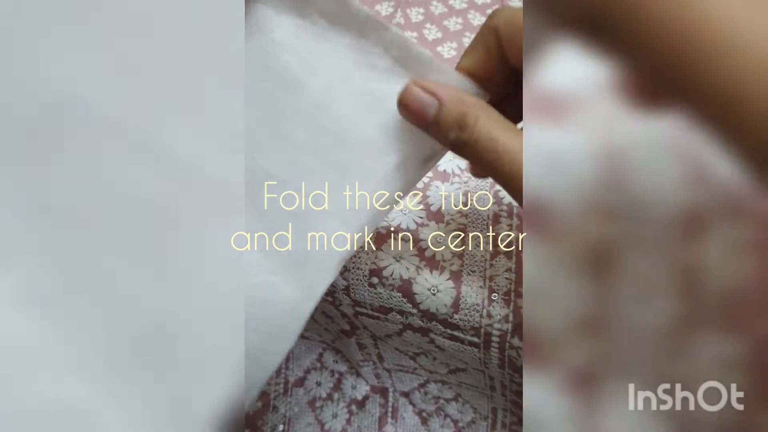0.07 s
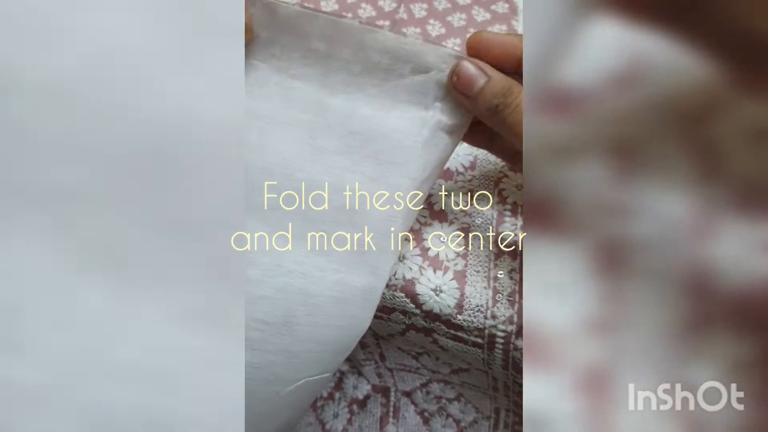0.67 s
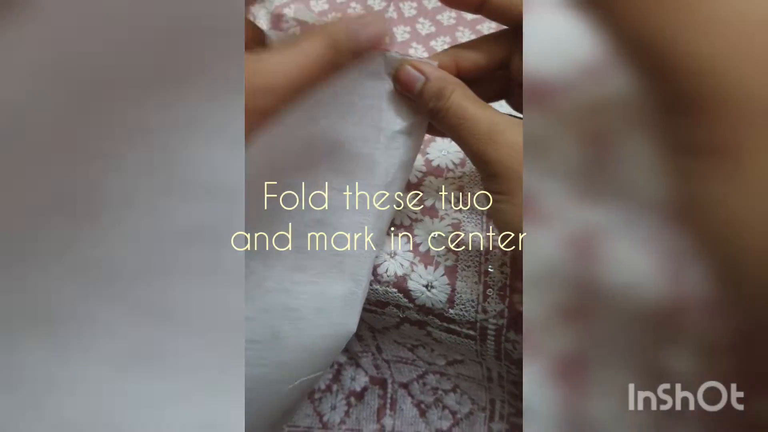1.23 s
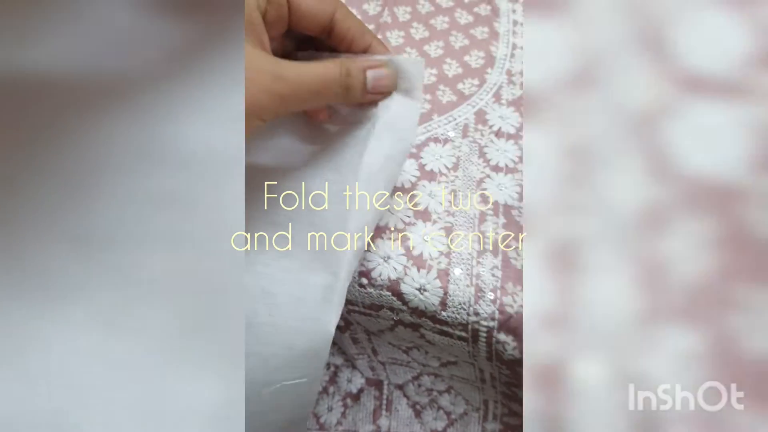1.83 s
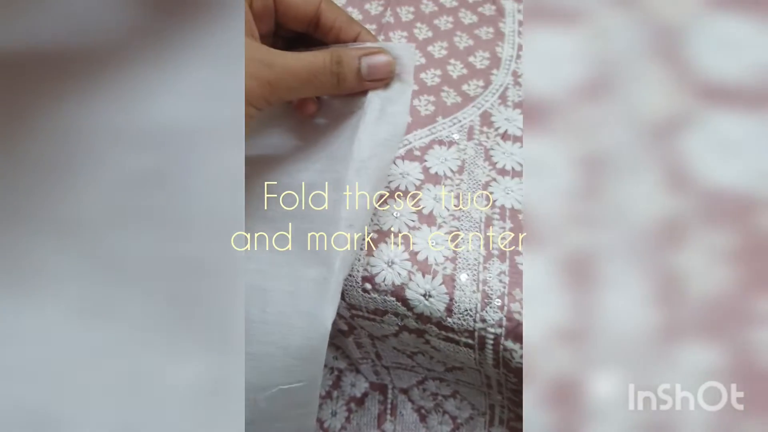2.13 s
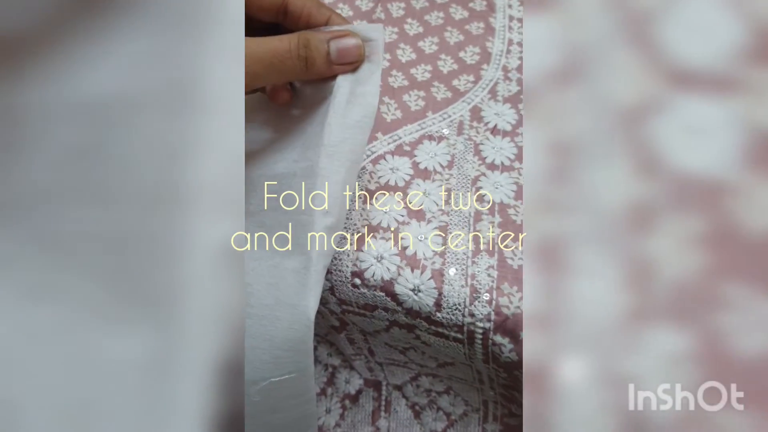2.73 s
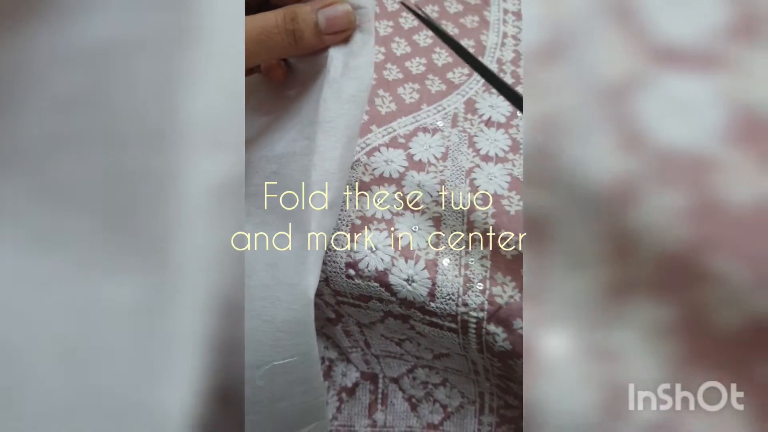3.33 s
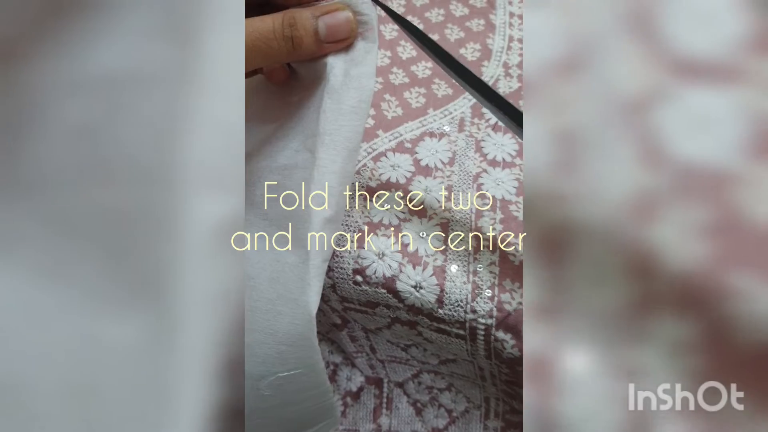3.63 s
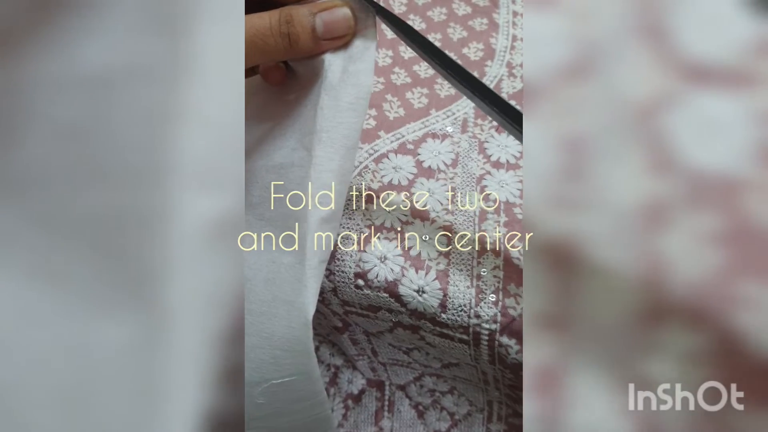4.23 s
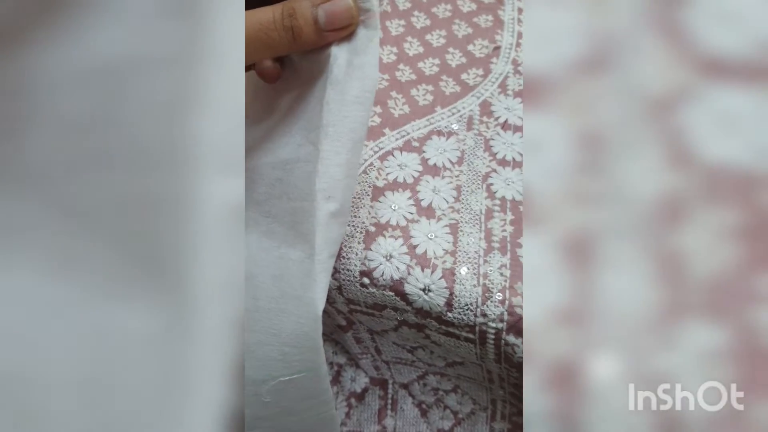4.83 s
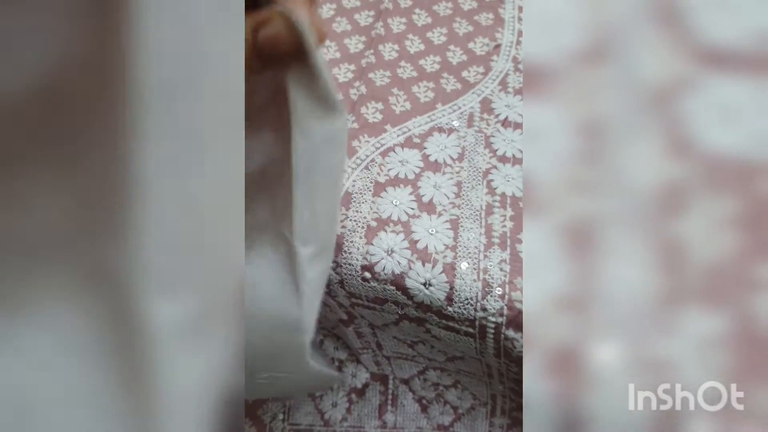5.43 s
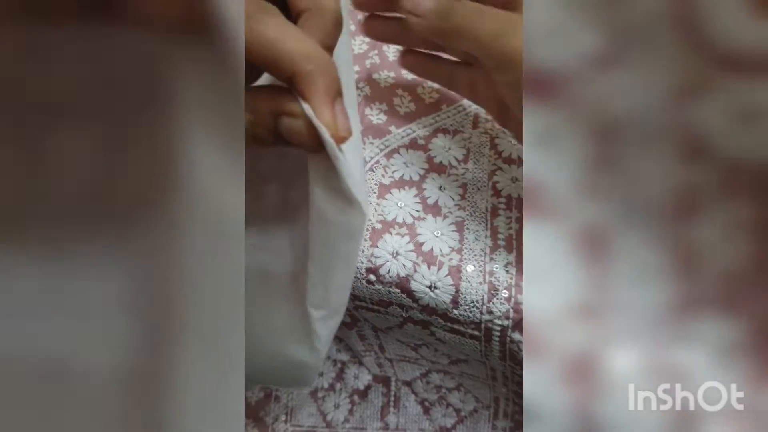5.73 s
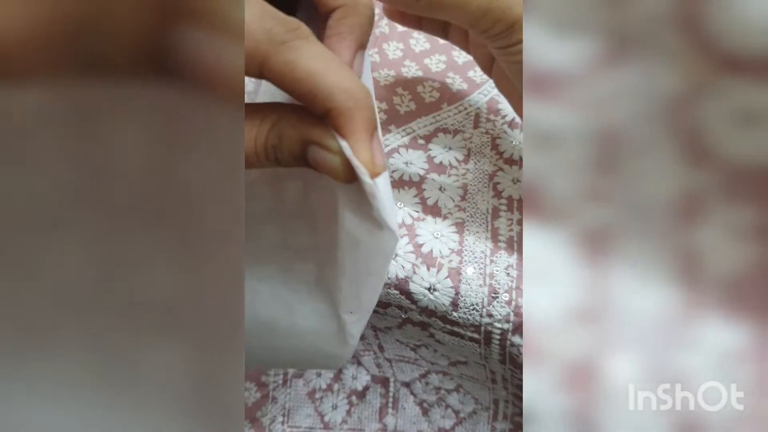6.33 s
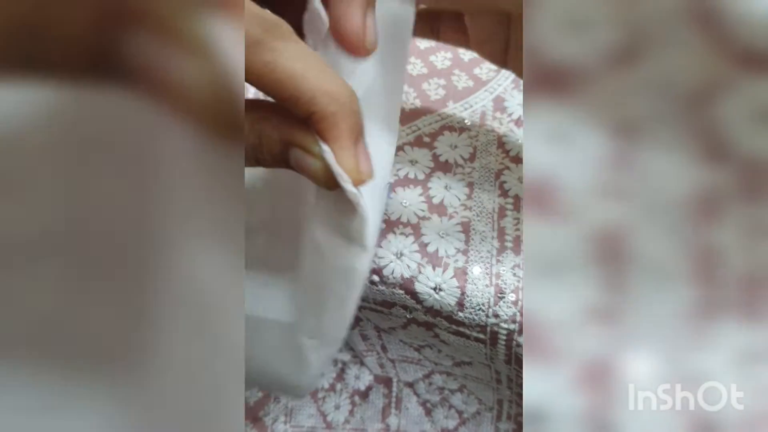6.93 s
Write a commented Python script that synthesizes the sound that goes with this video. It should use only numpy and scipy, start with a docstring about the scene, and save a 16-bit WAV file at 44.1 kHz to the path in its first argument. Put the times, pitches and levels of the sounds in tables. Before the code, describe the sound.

For the first two seconds, stiff cloth rustles and ticks very faintly over a low room hum. At about 2.4 seconds steel scissors are picked up with a click, a short scrape and a knock on a covered table. Two deep, soft microphone bumps follow on the right around 2.7 seconds, and the blades open with a small scrape and click at 2.9. After a quiet stretch, they close in one crisp, bright snip at 4.5 seconds, with a lighter click just after. From 5 seconds the scissors tap the table and slide, then drop at 5.3 with a metallic clatter and a hollow boom, the loudest moment. A few knocks settle by 5.5, leaving a faint thin tone. Soft cloth rustles and ticks return from about 5.8 to 7.2 seconds as the hum swells slightly. Everything sounds close, in a small bare room.

```python
"""Scissors snip folded cloth

Stiff cloth rustles and ticks as it is folded on a covered table in a small bare room, over a low hum.
Close to a phone, steel scissors are picked up, opened and closed in one snip; each click and scrape
rings the blades. Laid down, they touch, slide and drop, and the table booms."""
import sys
import numpy as np
from scipy import signal
from scipy.fft import rfft, irfft
from scipy.io import wavfile

SR = 44100
rng = np.random.default_rng(int(sys.argv[2]) if len(sys.argv) > 2 else 0)


def inscribe(sig):
    """Save sig as 16-bit PCM at rate SR to the path in sys.argv[1].

    A 1-D sig is mono; a 2-D sig holds one channel per row.
    Samples are clipped to [-1, 1] before scaling.
    """
    pcm = np.round(np.clip(np.atleast_2d(sig).T, -1, 1) * 32767)
    wavfile.write(sys.argv[1], SR, pcm.astype(np.int16))


N = 312669
T = np.arange(N) / SR
RING_T = T[:SR * 2 // 3]  # seconds, long enough for one blow or echo
# A ring_s is the time to fade by 60 dB; a fall time is the time to fade to about a third.


def undb(db):
    """Turn decibels into a gain."""
    return 10 ** (np.asarray(db) / 20)


def unit(x):
    """Scale x to an average (rms) level of 1."""
    return x / np.sqrt(np.mean(x ** 2))


def at(points, hz):
    """Read a curve of (pitch_hz, value) points, with octaves evenly spaced."""
    pitches, values = np.transpose(points)
    return np.interp(np.log(hz + 1), np.log(pitches), values)


def freqs(x):
    """The frequencies in the spectrum of x."""
    return np.fft.rfftfreq(x.shape[-1], 1 / SR)


def colour(x, points, tilt_db=0):
    """Shape the spectrum of x, tilting the treble by tilt_db per octave."""
    hz = freqs(x)
    gain_db = at(points, hz) + tilt_db * np.log2(np.maximum(hz, 1500) / 6000)
    return irfft(rfft(x) * undb(gain_db), x.shape[-1])


def band(x, hz, octaves):
    """Keep a band of pitches around hz."""
    edges = np.clip([hz / 2 ** (octaves / 2), hz * 2 ** (octaves / 2)], 10, SR / 2 - 100)
    return signal.sosfilt(signal.butter(2, edges, "band", fs=SR, output="sos"), x)


def high_pass(x, hz):
    """Thin out the bass."""
    return signal.sosfilt(signal.butter(3, hz, "high", fs=SR, output="sos"), x)


def add(out, start_s, x):
    """Mix x into out from start_s on."""
    i = int(start_s * SR)
    x = x[..., max(-i, 0):N - i]
    out[:, max(i, 0):max(i, 0) + x.shape[-1]] += x


def through(x, response):
    """Let every sample of x set off a ring or an echo."""
    return signal.fftconvolve(x, np.atleast_2d(response), axes=1)[:, :x.shape[1]]


def stereo_noise(size):
    """Noise from all sides at two microphones: alike in the bass, less so above."""
    # how alike left and right are: pitch_hz, correlation
    likeness = [(60, .6), (130, .98), (320, .94), (520, .4), (1100, -.3), (2200, .1), (6000, .3),
                (13000, .55)]
    mid, side = rfft(rng.standard_normal((2, size)))
    alike = np.clip(at(likeness, np.fft.rfftfreq(size, 1 / SR)), -1, 1)
    common = mid * np.sqrt((1 + alike) / 2)
    opposed = np.array([[1], [-1]]) * side * np.sqrt((1 - alike) / 2)
    return irfft(common + opposed, size)


def ringing(tones, scatter_db):
    """A struck object's fading tones; the spot that is hit varies their levels by scatter_db."""
    ring = 0
    for k, (hz, db, ring_s) in enumerate(tones):
        gain = (-1) ** k * undb(db + scatter_db * rng.standard_normal())
        ring += gain * np.sin(2 * np.pi * hz * RING_T) * np.exp(-np.log(1000) * RING_T / ring_s)
    return ring / np.linalg.norm(ring)


def friction(length_s, rise_share, spectrum, tilt_db, slips_per_s, spread_db=3.5):
    """Rubbing is many tiny slips of uneven size, swelling and dying with the stroke."""
    t = np.arange(0, length_s, 1 / SR)
    hold = max(int(SR / slips_per_s), 1)
    slip_db = spread_db * np.clip(rng.standard_normal(len(t) // hold + 1), -2, 2)
    slips = np.repeat(undb(slip_db), hold)[:len(t)]
    swell = np.sin(np.pi / 2 * np.interp(t / length_s, [0, min(rise_share, 1), 1], [0, 1, 0])) ** 2
    return unit(colour(stereo_noise(len(t)) * slips, spectrum, tilt_db)) * swell


def room(x, wet_db, gap_s):
    """Bare walls add a wash of echoes, with little deep bass, that builds up after a short gap."""
    # how long the room rings: pitch_hz, ring_s
    ring_times = [(100, 0.3), (500, 0.42), (1500, 0.374), (4000, 0.31), (11000, 0.37), (15500, 0.27)]
    hz, t, cells = signal.stft(stereo_noise(SR), SR, nperseg=256)
    fade = np.exp(-np.log(1000) * t / at(ring_times, hz)[:, None])
    tail = signal.istft(cells * fade, SR)[1][:, :len(RING_T)]
    tail = high_pass(tail, hz=147) * np.clip(RING_T / gap_s - 1, 0, 1)
    return x + undb(wet_db) * through(x, tail / np.linalg.norm(tail[0]))


def background(hum_hz=57, drift_hz_per_s=0.92, hum_db=-72, ramp_s=0.024):
    """Room air, faint wavering tones and a low hum that swells out of a rumble."""
    # swells of the hum: start_s, end_s, level_db
    swells = [(2.09, 2.66, -65), (4.811, 5.297, -70.5), (6.286, 6.996, -60.5)]
    # faint tones in the room: pitch_hz, level_db
    tones = [(199.2, -90), (452.2, -87)]
    # spectrum of the room air: pitch_hz, level_db
    air_colour = [(20, -37.5), (30, -23), (42, -17), (62, -9.5), (90, -6.5), (140, -12.5), (170, -26.5),
                  (200, -16), (240, -21), (450, -21), (560, -30.5), (1200, -36), (6000, -46.5), (9500, -42),
                  (16000, -42.5)]
    swell = sum(undb(db) * np.clip(np.minimum(T - start, end - T) / ramp_s, 0, 1)
                for start, end, db in swells)
    phase = 2 * np.pi * np.cumsum(hum_hz + drift_hz_per_s * T) / SR
    hum = np.sqrt(2) * np.sin(phase) * (undb(hum_db) + swell)
    rumble = undb(-70) * unit(band(stereo_noise(N), hz=61.7, octaves=0.837))
    drone = sum(undb(db) * unit(band(rng.standard_normal(N), hz, octaves=0.055)) for hz, db in tones)
    air = undb(-69) * unit(colour(stereo_noise(N), air_colour))
    return hum + rumble + drone + air


def mount_bumps(rest_hz=56.84, extra_hz=64.96, relax_s=0.03011, rise_s=0.0382, fall_s=0.0382):
    """The phone's bumped mount swings faster while pressed, then sags in pitch as it relaxes."""
    # soft bumps on the mount: start_s, level_db
    bumps = [(2.657, -26.5), (2.764, -24.5)]
    out = np.zeros((2, N))
    hz = rest_hz + extra_hz * np.exp(-RING_T / relax_s)
    swing = np.sin(2 * np.pi * np.cumsum(hz) / SR)
    rise = np.sin(np.pi / 2 * np.minimum(RING_T / rise_s, 1)) ** 2
    fall = np.exp(-np.maximum(RING_T - rise_s, 0) / fall_s)
    for start_s, db in bumps:
        noise = rng.standard_normal(len(RING_T))
        shudder = unit(band(band(noise, hz=80, octaves=2), hz=80, octaves=2))
        add(out, start_s, undb(db) * rise * fall * (swing + undb(-8) * shudder))
    return out * undb([[-34], [0]])  # almost all on the right


def cloth(fold_db=-10, tick_rise_s=0.0012, tick_fall_s=0.00533):
    """The weave hisses under the fingers, takes a tone from the fold and ticks where it buckles."""
    # fingers rub the cloth: peak_s, length_s, level_db, tilt_db_per_octave, fold_hz
    rubs = [(0.155, 0.203, -79.5, 0.5, 1530), (0.342, 0.1453, -67, -3, 784), (0.627, 0.151, -74.5, 3, 1615),
            (0.839, 0.151, -77.5, 4, 1610), (1.13, 0.093, -71.5, 4, 1690), (1.189, .1, -71, -2, 3500),
            (1.597, 0.39, -72, -6.5, 698), (1.805, 0.1138, -67, -2.5, 12200),
            (1.793, 3.01, -85.5, -0.5, 10400), (2.63, 0.676, -74, 2.5, 3980), (5.836, .3, -78.5, 0.5, 3235),
            (6.364, 0.11, -74.5, -2.5, 1690), (6.536, 0.1994, -68.5, -1.5, 3604),
            (6.645, 0.1112, -64.5, -2, 1554), (6.881, 0.406, -80.5, -2, 8060),
            (7.08, 0.1385, -67.5, -3.5, 2996)]
    # the stiff cloth buckles: start_s, level_db
    creases = [(0.114, -63), (.96, -76), (1.091, -70.5), (1.581, -59.5), (1.841, -59.5), (2.31, -61),
               (6.62, -55.5), (7.072, -68.5)]
    # spectrum of the weave's hiss: pitch_hz, level_db
    weave_colour = [(200, 8), (700, -1), (1100, -6.5), (1800, -3.5), (3500, -10), (5500, -3.5), (8000, 2),
                    (12500, -0.5), (16000, -13.5)]
    out, t = np.zeros((2, N)), RING_T[:SR // 10]
    for peak_s, length_s, db, tilt_db, fold_hz in rubs:
        hiss = friction(length_s, .5, weave_colour, tilt_db, slips_per_s=190)
        fold = unit(band(hiss, fold_hz, octaves=.55)) * np.std(hiss)
        add(out, peak_s - length_s / 2, undb(db) * (hiss + undb(fold_db) * fold))
    tick_shape = np.exp(-t / tick_fall_s) * (1 - np.exp(-t / tick_rise_s))
    for start_s, db in creases:
        fibres = stereo_noise(len(t))
        tick = unit(band(fibres, hz=1620, octaves=0.91))
        hiss = undb(-6) * unit(colour(fibres, weave_colour))
        add(out, start_s, undb(db) * (tick + hiss) * tick_shape)
    return out


def blow(hz, octaves, fall_ms, ring_db, crack_db=-25, rise_s=0.0008, cover_fall_s=.35):
    """One blow or soft slide on the table: a dull thud, a faint crack and a ring that the cover shortens."""
    # tones of the board without its cover: pitch_hz, level_db, ring_s
    board_tones = [(113, 4, .5), (126, -9, .3), (202, -7, .5), (258, -1, .5), (286, 0, .45), (315, -3, .4),
                   (336, -5, .4), (400, -5, .35), (453, -2, .35), (500, -4, .35), (515, -3, .35),
                   (559, -4, .35), (628, -8, .4), (659, -6, .4), (788, -9, .35), (960, -6, .4),
                   (1015, -9, .42), (1407, -10, .4)]
    onset = SR // 25  # the first 40 ms set the levels
    rattle = stereo_noise(len(RING_T)) * np.exp(-RING_T * 1000 / fall_ms)
    rattle *= 1 - np.exp(-RING_T / rise_s)
    thud = band(rattle, hz, octaves)
    board = band(ringing(board_tones, scatter_db=0), hz, octaves) * np.exp(-RING_T / cover_fall_s)
    crack = band(rattle, 2 * hz, octaves=5.3)
    thud, board, crack = (part / np.std(part[..., :onset]) for part in (thud, board, crack))
    hit = thud + undb(ring_db) * board + undb(crack_db) * crack
    return hit / np.std(hit[:, :onset])


def table(heavy_db=-36, full_boom_db=-28):
    """Every blow or soft slide knocks; heavy ones also flex the whole board, which booms."""
    # blows and soft slides on the table (slides fall slowly): start_s, level_db, pitch_hz, width_octaves,
    # fall_ms
    knocks = [(0.11, -62, 284, 1.43, 4.8), (.184, -69, 353, 0.64, 2.1), (0.228, -78.5, 589, 0.73, 3.3),
              (.24, -63.5, 189, 2.28, 9), (1.09, -76.5, 690, 1.59, 2.07), (2.231, -63.5, 232.7, 1.31, 42),
              (2.312, -58.5, 369, 1.54, 40), (2.388, -44.5, 289.2, 0.692, 46),
              (2.396, -59.5, 984, 0.98, 10.1), (2.68, -56, 175.8, 1.35, 19), (3.082, -55, 165, 1.825, 34.3),
              (3.096, -59, 425.6, 0.92, 69.4), (4.531, -62.5, 392, 1.24, 6.5),
              (5.007, -42.5, 251.5, 0.312, 42.5), (5.02, -54, 544, 1.62, 87),
              (5.05, -41.5, 256.2, 0.332, 59.5), (5.2604, -27, 450, 1.4, 5), (5.275, -24, 498, 0.55, 14),
              (5.299, -24, 320, 1.54, 63), (5.323, -25.5, 919, 1.48, 8.3), (5.341, -36.5, 1774, 0.9, 43),
              (5.393, -28, 383.2, 2, 11), (5.406, -25, 441, 1.1, 13), (5.4375, -33.5, 894, 1.15, 26),
              (5.498, -36, 331, 1.8, 20)]
    out = np.zeros((2, N))
    for start_s, db, hz, octaves, fall_ms in knocks:
        boom_db = full_boom_db + 4 * min(db - heavy_db, 0)  # light blows barely boom
        add(out, start_s, undb(db) * blow(hz, octaves, fall_ms, ring_db=-1))
        add(out, start_s, undb(boom_db) * blow(hz=108, octaves=0.99, fall_ms=34, ring_db=6))
    return out


def lingering_tone():
    """One thin tone outlasts the boom of the table."""
    # the tone after the drop: start_s, pitch_hz, level_db, ring_s
    tone = (5.324, 620, -64, 2.0)
    start_s, hz, db, ring_s = tone
    t = np.maximum(T - start_s, 0)
    return undb(db) * np.sin(2 * np.pi * hz * t) * np.exp(-np.log(1000) * t / ring_s)


def blades(contact, start_s, ring_db=-11, grip_db=5, grip_octaves=.1):
    """A contact rings the blades, a little differently with every grip and opening."""
    # blade tones, damped by the hand and the table cover: pitch_hz, level_db, ring_s
    steel_tones = [(2100, -4, .03), (2300, -4, .03), (2570, -1, .03), (2970, -1, .04), (4010, -5, .025),
                   (4260, -4, .025), (4750, -5, .02), (5990, -3, .02), (6850, -3, .018), (7760, 1, .018),
                   (9860, -1, .015), (10500, -3, .015), (11500, -3, .01), (12550, -1, .01),
                   (13700, -3, .01)]
    # the pitch that the grip lets ring most: time_s, pitch_hz
    grips = [(2.4, 2970), (2.9, 2270), (4.5, 2377), (5.1, 2860), (5.3, 2920)]
    contact = np.pad(contact, ((0, 0), (0, SR // 3)))
    free_hz = np.interp(start_s, *np.transpose(grips))
    tones = []
    for hz, db, ring_s in steel_tones:
        boost_db = grip_db * np.exp(-(np.log2(hz / free_hz) / grip_octaves) ** 2)
        tones.append((hz * (1 + rng.standard_normal() / 40), db + boost_db, ring_s))
    ring = ringing(tones, scatter_db=2.5)[:SR // 3]
    return contact + undb(ring_db) * through(contact, ring)


def scissors(click_rise_s=0.00079, click_fall_s=0.00253):
    """Steel clicks and scrapes, and each contact sets the two blades ringing."""
    # steel meets steel or the table: start_s, level_db, tilt_db_per_octave
    clicks = [(2.3867, -30, -4.5), (2.871, -50.5, -2.5), (2.9107, -36, -2), (4.4477, -49, 2),
              (4.5035, -25, 10.5), (4.5319, -28.5, 1.5), (4.758, -39.5, 2), (5.0099, -29, -2),
              (5.0486, -26, -4), (5.0734, -36, 0.5), (5.139, -34.5, -1.5), (5.2624, -26.5, 3.5),
              (5.297, -19.5, -3.5), (5.3276, -14.5, 0), (5.3314, -20, 1), (5.387, -30.5, -6)]
    # steel slides: start_s, length_s, rise_share (part spent swelling), level_db, tilt_db_per_octave
    scrapes = [(2.394, 0.126, 0.043, -51, -5), (2.888, .046, 0.456, -44, -1.5),
               (3.825, 0.0758, 0.57, -64.5, 0), (4.455, 0.0142, .5, -47, 3.5),
               (4.496, 0.0235, 0.457, -42, 1), (4.517, .021, 0.654, -36, 1.5),
               (4.745, 0.0217, 0.245, -51.5, -0.5), (5.026, 0.2903, 0.27, -42.5, -4)]
    # spectrum of a steel contact: pitch_hz, level_db
    steel_colour = [(300, -18), (1300, -15.5), (1800, -12.5), (2150, -8), (2550, -1.5), (3400, -7),
                    (4400, -2), (5200, -4.5), (7700, 0), (11000, -1.5), (13000, 2), (16000, -13)]
    out, t = np.zeros((2, N)), RING_T[:SR // 20]
    click_shape = np.exp(-t / click_fall_s) * (1 - np.exp(-t / click_rise_s))
    for start_s, db, tilt_db in clicks:
        click = unit(colour(stereo_noise(len(t)), steel_colour, tilt_db)) * click_shape
        add(out, start_s, undb(db) * blades(click, start_s))
    for start_s, length_s, rise_share, db, tilt_db in scrapes:
        slide = friction(length_s, rise_share, steel_colour, tilt_db, slips_per_s=500)
        add(out, start_s, undb(db) * blades(slide, start_s))
    return out


def scene():
    """Scissors, table and cloth in the room, with the bumps and the background."""
    return (room(scissors(), wet_db=-5.5, gap_s=0.0033)
            + room(table(), wet_db=-9, gap_s=0.02) + lingering_tone()
            + room(cloth(), wet_db=-6, gap_s=0.005)
            + mount_bumps() + background())


def record(dry, top_hz=16200):
    """The phone's two microphones each colour the sound; it cuts the deepest bass and the very top."""
    # balance of the microphones: pitch_hz, left_minus_right_db
    balance = [(50, -8.5), (120, -1.5), (300, -4.5), (650, -5.5), (1200, -5), (2200, -3.5), (4500, 1.5),
               (8000, -0.5)]
    lean_db = at(balance, freqs(dry)) * np.array([[1], [-1]]) / 2
    heard = high_pass(irfft(rfft(dry) * undb(lean_db), N), hz=42)
    return signal.sosfilt(signal.ellip(10, .2, 70, top_hz, fs=SR, output="sos"), heard)


dry = scene()
out = record(dry)
inscribe(out)
```